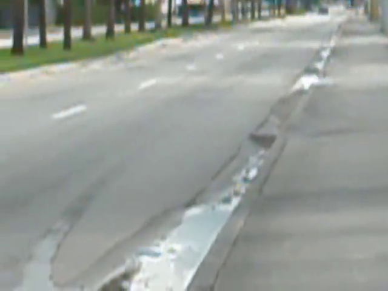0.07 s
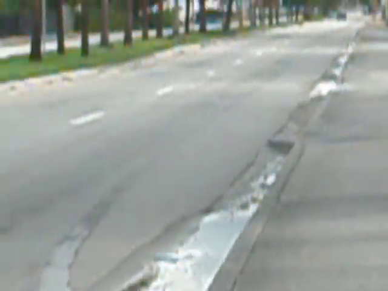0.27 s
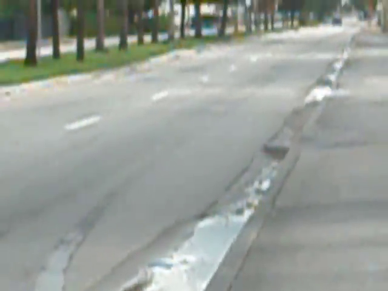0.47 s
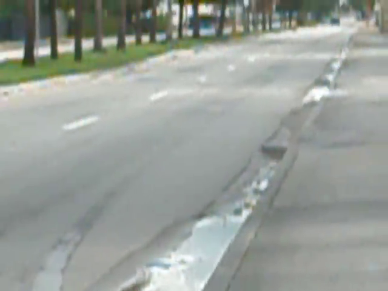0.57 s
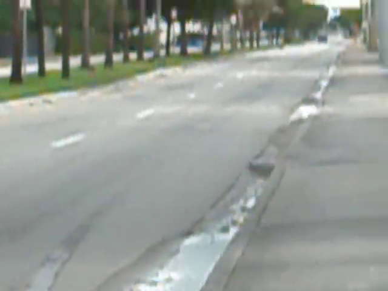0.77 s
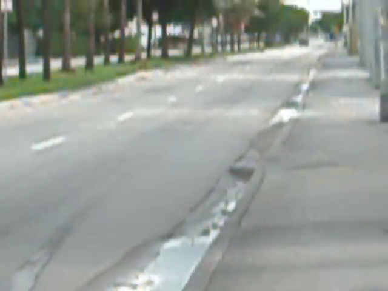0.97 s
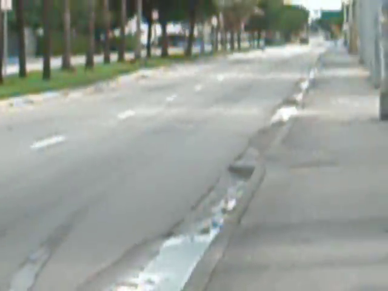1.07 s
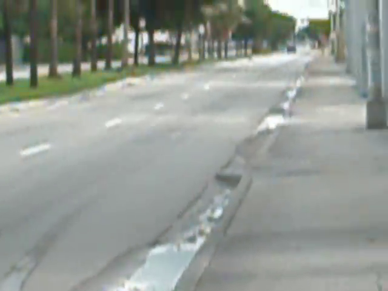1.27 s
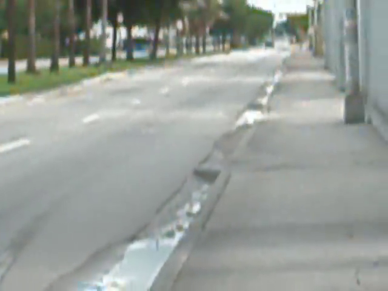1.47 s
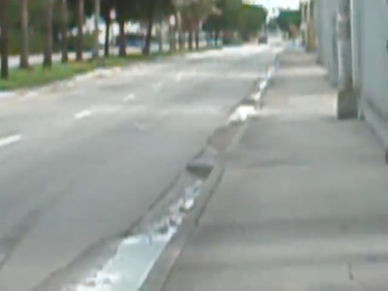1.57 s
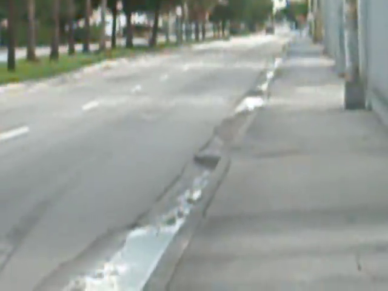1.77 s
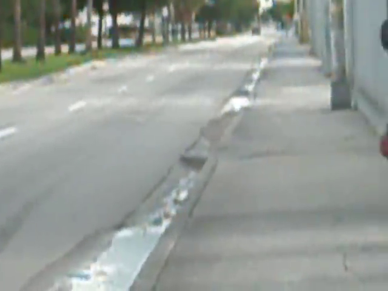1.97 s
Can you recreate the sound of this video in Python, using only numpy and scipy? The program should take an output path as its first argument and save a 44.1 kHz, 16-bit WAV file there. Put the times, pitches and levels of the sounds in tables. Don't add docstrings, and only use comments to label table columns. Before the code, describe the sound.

A rotary car engine idles roughly at the kerb, uneven pops thumping and ringing the exhaust over steady hiss; thin metal squeals flicker throughout. Open street, close cheap mono microphone, muffled treble and clipped peaks.

```python
import sys
import numpy as np
from scipy import signal
from scipy.io import wavfile

SR = 44100
rng = np.random.default_rng(int(sys.argv[2]) if len(sys.argv) > 2 else 0)


def digitize_waveform(pressure):
    field = np.atleast_2d(pressure).T
    bounded = np.clip(field, -1, 1)
    quanta = np.round(bounded * 32767).astype(np.int16)
    wavfile.write(sys.argv[1], SR, quanta)


def ratio_of_db(decibels):
    return 10 ** (np.asarray(decibels, float) / 20)


N = 88596

# f/Hz, level/dB per Hz
RUMBLE_SPECTRUM = [(22, -8), (45, -4.5), (80, 10.5), (105, 7.5), (150, -18)]
# t/s, f/Hz, level/dB
DRONE = [
    (0, 77, -28),
    (.1, 75.5, -28),
    (.48, 75.5, -29),
    (.58, 76, -45),
    (1.0, 82, -50),
    (1.06, 83, -36),
    (1.13, 84, -48),
    (2.01, 84, -50),
]
# f/Hz, level/dB per Hz
HISS_SPECTRUM = [(190, -11.5), (320, -6.5), (600, -16.5), (900, -6), (1500, -15), (2400, -18.5),
                 (3100, -12), (4600, -17.5)]
# t/s, level/dB
EFFORT = [
    (0, -1.5),
    (.5, -2.5),
    (.9, 0.5),
    (1.3, -2.5),
    (1.7, 0.5),
    (2.01, 2.5),
]
PART_HZ = [2555, 2710, 3015, 3635, 4000, 4360, 3200, 3360, 3545]
# start t/s, length t/s, level/dB
SQUEAL_FITS = [
    [(.36, 0.069, -28.5), (1.4, 0.12, -30)],
    [(.1, 0.1, -28.5), (.36, 0.12, -26.5)],
    [(.5, 0.14, -18), (.66, 0.1, -31.5), (.8, 0.076, -27), (.994, 0.037, -22.5), (1.09, 0.085, -20.5),
     (1.283, 0.21, -24.5), (1.38, 0.056, -32), (1.83, 0.21, -26)],
    [(.07, 0.12, -16.5), (.263, .21, -21), (.8, 0.21, -31), (1.39, 0.072, -20), (1.5, 0.064, -17.5),
     (1.6, 0.22, -23), (1.79, 0.051, -17.5), (1.87, 0.077, -21.5), (1.956, 0.042, -20)],
    [(.08, .1, -27.5), (.525, 0.1, -24), (1.355, 0.04, -24), (1.855, 0.054, -37)],
    [(.07, .07, -26.5), (.29, 0.15, -23), (1.39, 0.24, -33.5), (1.79, 0.2, -21.5)],
    [(.36, 0.051, -20.5), (1.31, .07, -22), (1.6, 0.088, -28)],
    [(.03, 0.049, -24), (1.0, 0.28, -28), (1.3, 0.048, -32)],
    [(.17, 0.038, -22), (.3, 0.36, -27), (.54, 0.15, -26.5), (1.45, 0.054, -43.5), (1.9, 0.075, -30)],
]
# slot number, level on silencer and higher pipe tones/dB, level on low pipe tones/dB, crack
# level/dB
FIRINGS = [
    (0, 0, 0, 0),
    (2, -.5, -.5, 0),
    (4, -1, -3, -1),
    (5, -1, -1.5, -1),
    (7, -2.5, -3, -2.5),
    (9, -3, -7, -5),
]
# f/Hz, level/dB, t60/s
SILENCER = [(251, -6, 0.15), (335.2, -4, 0.089)]
# f/Hz, level/dB, t60/s
PIPE_LOW = [(214, -26.5, 0.13), (473.6, -11, 0.098)]
# f/Hz, level/dB, t60/s
PIPE_HIGH = [(828, -26.5, 0.12), (875, -17, 0.086), (916, -11.5, 0.066), (1027.6, -19.5, .1),
             (1147, -27, .08), (1563, -22.5, 0.055), (2010, -24, 0.091), (2920, -30, 0.086),
             (3664, -31, .04)]
# f/Hz, level/dB, t60/s
PIPE_TIP = [(1000, -14.5, 0.004)]
# f/Hz, level/dB per Hz
CRACK_SPECTRUM = [(1100, -18), (1500, -11), (2000, -7), (2450, -11), (3000, 0), (3700, 0), (4200, -5),
                  (4600, -4)]

SLOTS = 12
CYCLES = 17
FIRST_S, CYCLE_S, SLOWING_S = .0768, .142403, .000345
JITTER_S, UNEVEN_DB = .00008, 1.17


def rms_one(x):
    return x / np.sqrt(np.mean(x ** 2) + 1e-20)


def in_time(rows):
    s, *columns = np.transpose(rows)
    return [np.interp(np.arange(N) / SR, s, column) for column in columns]


def drift(rate_hz):
    r = np.exp(-2 * np.pi * rate_hz / SR)
    noise = rng.standard_normal(N + SR)
    return rms_one(signal.lfilter([1], [1, -2 * r, r * r], noise)[SR:])


def coloured(spectrum, patchy_db, rate_hz):
    hz, db = np.transpose(spectrum)
    edges = 20 * 2 ** np.arange(0, 8.1, 1 / 3)
    white = rng.standard_normal((2, N))
    out = 0
    for k, (low, high) in enumerate(zip(edges, edges[1:])):
        if high > hz[0] and low < hz[-1]:
            band_pass = signal.butter(2, [low, high], "band", fs=SR, output="sos")
            band = signal.sosfilt(band_pass, white[k % 2])
            band_db = np.interp(np.log(low * high) / 2, np.log(hz), db)
            out = out + band * ratio_of_db(band_db + patchy_db * drift(rate_hz))
    return rms_one(out)


def ring(clicks, modes):
    out = 0
    for hz, db, t60_s in modes:
        r = ratio_of_db(-60 / (t60_s * SR))
        w = 2 * np.pi * hz / SR
        tone = signal.lfilter([0, np.sin(w)], [1, -2 * r * np.cos(w), r * r], clicks)
        out = out + ratio_of_db(db) * tone
    return out


def street():
    hz, db = in_time(DRONE)
    rumble = ratio_of_db(-35.5) * coloured(RUMBLE_SPECTRUM, patchy_db=2.0, rate_hz=3.0)
    drone = np.sqrt(2) * ratio_of_db(db) * np.sin(2 * np.pi * np.cumsum(hz) / SR)
    return rumble + drone


def engine_hiss(effort_db):
    return ratio_of_db(-21.5 + effort_db) * coloured(HISS_SPECTRUM, patchy_db=2.5, rate_hz=15.0)


def metal_squeals():
    edge_s, rough_db, wander_hz = .02, 3, 13
    t = np.arange(N) / SR
    out = 0
    for hz, fits in zip(PART_HZ, SQUEAL_FITS):
        gate = 0
        for start, length, db in fits:
            inside = np.minimum(t - start, start + length - t)
            gate = gate + ratio_of_db(db) * np.clip(inside / edge_s + .5, 0, 1)
        phase = 2 * np.pi * np.cumsum(hz + wander_hz * drift(8.38)) / SR
        out = out + gate * ratio_of_db(rough_db * drift(38.0)) * np.sin(phase)
    return out


def firing_clicks(slot_db, chance):
    turn = np.arange(-2 * SLOTS, (CYCLES - 2) * SLOTS) / SLOTS
    s = FIRST_S + CYCLE_S * turn + SLOWING_S * turn ** 2 + JITTER_S * chance[:, 0]
    clicks = np.full(N + 2 * SR, 1e-18)
    clicks[((s + 1) * SR).astype(int)] = ratio_of_db(np.tile(slot_db, CYCLES) + UNEVEN_DB * chance[:, 1])
    return clicks


def pipe_tones(beat, fire, fire_low):
    tones = ratio_of_db(-18.5) * ring(beat, SILENCER)
    tones = tones + ring(fire, PIPE_HIGH) - ring(fire, PIPE_TIP) + ring(fire_low, PIPE_LOW)
    low_cut = signal.butter(2, 180, "high", fs=SR, output="sos")
    return signal.sosfilt(low_cut, tones)[SR:SR + N]


def tip_cracks(fire_crack, effort_db):
    burst = 0
    for db, t60_s in [(0, .013), (-15, .1)]:
        burst = burst + ratio_of_db(db) * signal.lfilter([1], [1, -ratio_of_db(-60 / (t60_s * SR))], fire_crack)
    burst = signal.lfilter([.05], [1, -.95], burst)[SR:SR + N]
    return ratio_of_db(-7.5 + effort_db) * burst * coloured(CRACK_SPECTRUM, patchy_db=3.0, rate_hz=45.0)


def exhaust(effort_db):
    chance = rng.standard_normal((CYCLES * SLOTS, 2))
    slot, level, low, crack = np.transpose(FIRINGS)
    db = np.full((4, SLOTS), -200.)
    db[0] = -10
    db[:, slot.astype(int)] = [level, level, low, crack]
    beat, fire, fire_low, fire_crack = (firing_clicks(row, chance) for row in db)
    return pipe_tones(beat, fire, fire_low) + tip_cracks(fire_crack, effort_db)


def scene():
    effort_db, = in_time(EFFORT)
    return (street() + engine_hiss(effort_db) + metal_squeals() + exhaust(effort_db))[None]


def low_pass(x):
    return signal.sosfilt(signal.butter(12, 15900, fs=SR, output="sos"), x)


def record(dry):
    overload, offset, ceiling = .7, -.0138, .715
    drive = dry / overload
    x = overload * np.tanh(drive ** 3 / 3 + drive)
    x = signal.sosfilt(signal.butter(8, 3850, fs=SR, output="sos"), x)
    x = signal.sosfilt(signal.cheby2(12, 60, 4950, fs=SR, output="sos"), x)
    mix = np.clip(x + offset, -ceiling, ceiling)
    return low_pass(mix)


dry = scene()
out = record(dry)
digitize_waveform(out)
```